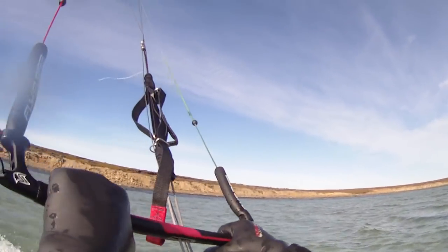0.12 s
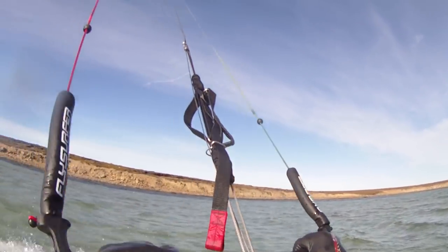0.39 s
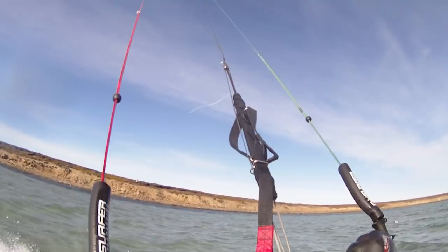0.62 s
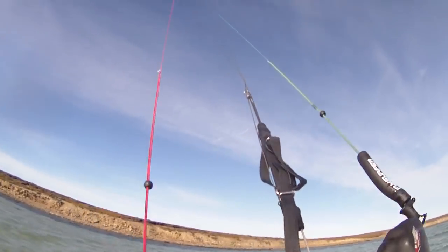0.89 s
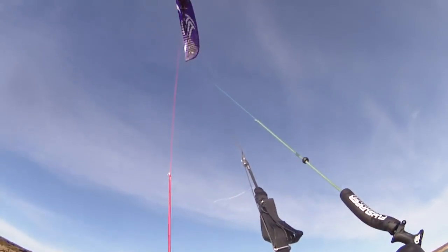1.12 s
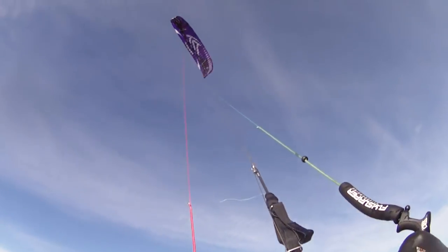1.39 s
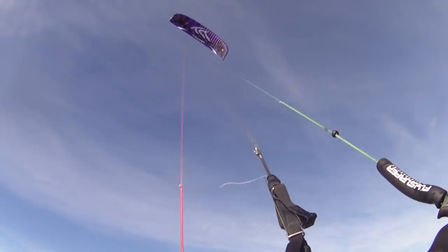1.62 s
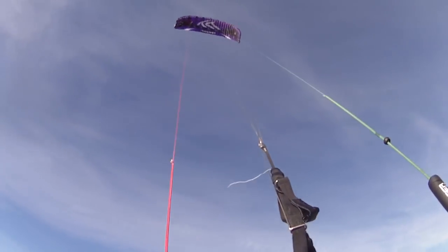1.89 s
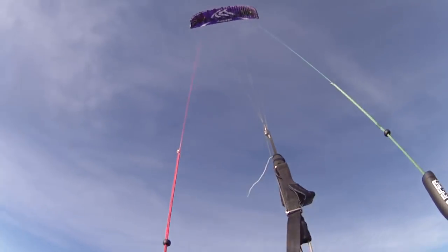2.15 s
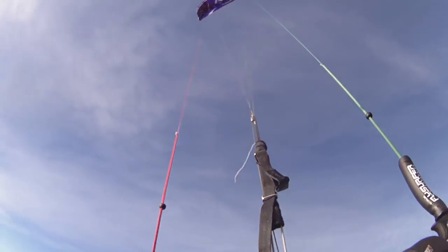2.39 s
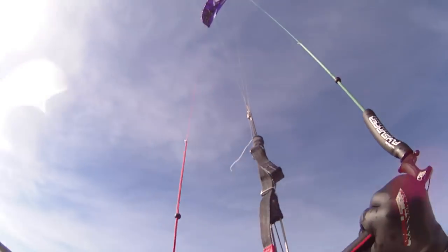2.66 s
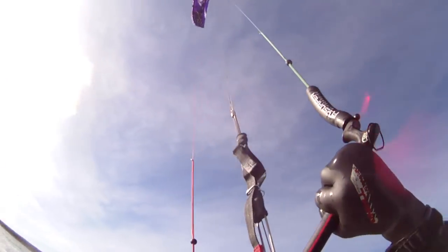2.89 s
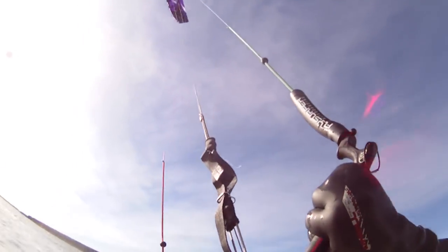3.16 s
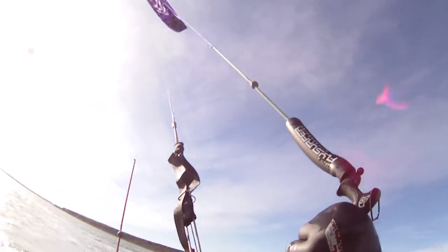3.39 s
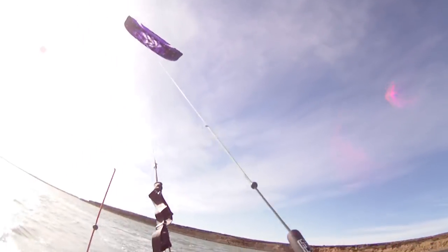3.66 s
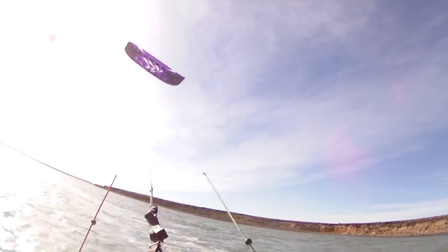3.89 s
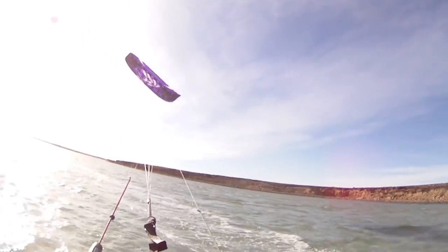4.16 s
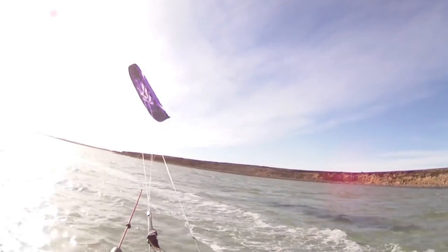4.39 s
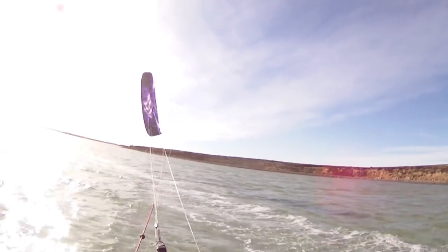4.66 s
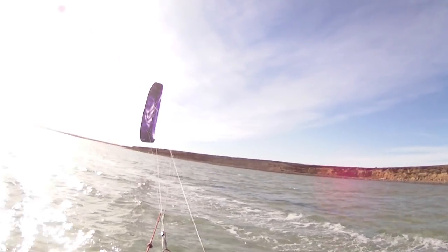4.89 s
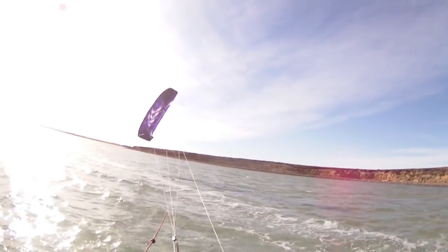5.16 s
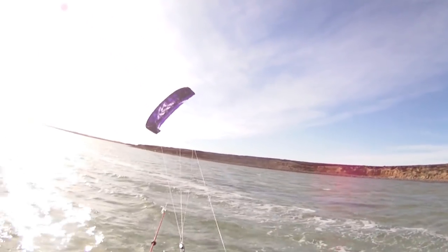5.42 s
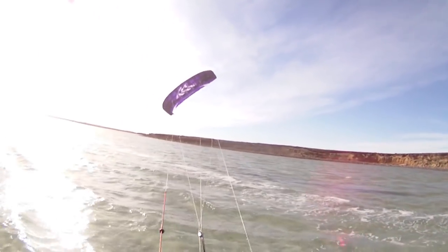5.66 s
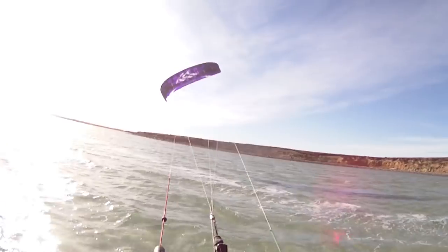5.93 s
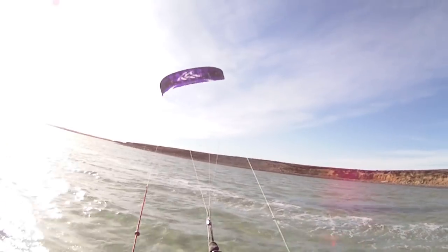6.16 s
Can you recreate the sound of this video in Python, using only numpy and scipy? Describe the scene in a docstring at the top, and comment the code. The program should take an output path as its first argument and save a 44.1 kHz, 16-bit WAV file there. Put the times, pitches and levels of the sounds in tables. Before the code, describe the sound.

A kite rider skims choppy water, heard from inside a sealed plastic case on the helmet. Light wind flutters boxily with soft slaps and thin spray hiss. A knock comes at one second, more cluster after two, then the wind surges and stays hard while loud hollow knocks and dry ticks rattle the mount. The knocks stop and strong gusts continue to the end.

```python
"""A rider planes over choppy water in strong wind, heard from inside a sealed plastic case on the helmet.
First light gusts buffet the case as lumpy noise shaped by its hollow, its edge whistles, soft slaps drive its
lowest modes and patchy noise hisses as spray, over a faint rumble and whine. From 1 s the mount ticks and knocks
ring the case modes; the head tilts back, the spray narrows and weakens. About 3 s the head turns: the spray changes
colour, the wind surges and stays hard, knocks come harder until 4.8 s, ticks until 5 s and slaps until 5.8 s."""
import sys
import numpy as np
from scipy import signal
from scipy.fft import rfft, irfft, next_fast_len
from scipy.io import wavfile

SR = 44100
rng = np.random.default_rng(int(sys.argv[2]) if len(sys.argv) > 2 else 0)


def attenuation_scalar(level_db):
    """Turn a level in dB into a linear amplitude multiplier (20 dB per decade)."""
    decades = np.asarray(level_db, float) / 20
    return 10 ** decades


def waveform_to_disk(signal):
    """Save audio, clipped to [-1, 1], as 16-bit WAV at the path in sys.argv[1]."""
    frames = np.transpose(np.atleast_2d(signal))
    scaled = np.clip(frames, -1, 1) * 32767
    samples = np.round(scaled).astype(np.int16)
    wavfile.write(sys.argv[1], SR, samples)


N = 277389


def rms_one(x):
    """Scale to rms 1."""
    return x / np.sqrt(np.mean(x ** 2) + 1e-20)


def in_time(rows):
    """Interpolate each column of a curve to one value per sample."""
    t_s, *columns = np.transpose(rows)
    return [np.interp(np.arange(N) / SR, t_s, column) for column in columns]


def butter(order, hz, kind, x):
    """Causal Butterworth filter."""
    return signal.sosfilt(signal.butter(order, hz, kind, fs=SR, output="sos"), x)


def drift(rate_hz):
    """Slow random curve of rms 1: noise twice through a one-pole low-pass."""
    r = np.exp(-2 * np.pi * rate_hz / SR)
    noise = rng.standard_normal(N + SR)
    return rms_one(signal.lfilter([1], [1, -2 * r, r * r], noise)[SR:])   # first second settles the filter


def coloured(x, spectrum):
    """Give x the spectrum with a causal (minimum-phase) filter; rms 1."""
    size = 2 * next_fast_len(N // 2 + 1)
    hz = np.fft.rfftfreq(size, 1 / SR) + 0.00086   # keeps log(0) away
    point_hz, point_db = np.transpose(spectrum)
    gain = attenuation_scalar(np.interp(np.log(hz), np.log(point_hz), point_db, -100, -100))
    cepstrum = irfft(np.log(gain), size)
    cepstrum[1:size // 2] *= 2   # fold to causal
    cepstrum[size // 2 + 1:] = 0
    response = np.exp(rfft(cepstrum))
    return rms_one(irfft(rfft(x, size) * response, size)[:N])


def ring(clicks, hz, t60_s):
    """Two-pole resonance: a unit click starts a decaying sine of initial height 1."""
    r, w = attenuation_scalar(-60 / (t60_s * SR)), 2 * np.pi * hz / SR
    return signal.lfilter([0, np.sin(w)], [1, -2 * r * np.cos(w), r * r], clicks + 1e-18)


def eddies(slow_db, fast_db):
    """Noise in lumps: eddies of several sizes roll over the case."""
    return rng.standard_normal(N) * attenuation_scalar(slow_db * drift(11.4) + fast_db * drift(71.0))


# gusts on the case: [t/s, level/dB]
GUSTS = [(0.0, -37), (0.18, -36.5), (0.32, -40.5), (0.39, -36), (0.45, -40), (0.55, -35), (0.62, -38.5),
         (0.78, -33), (0.92, -32.5), (1.25, -33.5), (1.36, -36), (1.52, -39.5), (2.2, -40.5), (2.35, -35),
         (2.47, -40), (2.56, -42), (2.62, -39.5), (2.72, -39), (2.9, -36.5), (3.1, -41), (3.145, -41),
         (3.16, -35.5), (3.5, -24.5), (3.85, -21.5), (3.97, -21.5), (4.07, -29), (4.4, -28.5), (4.55, -28),
         (4.7, -26.5), (4.93, -26.5), (5.04, -28.5), (5.13, -23), (5.24, -22.5), (5.34, -24), (5.78, -23),
         (5.9, -27.5), (6.16, -27), (6.28, -23.5)]


def gusts():
    """Wind strength on the case, the common drive of buffet, whistle and rumble."""
    return in_time(GUSTS)[0]


# buffet colour, light and hard gusts: [f/Hz, relative density/dB]
BUFFET_LIGHT = [(53, -85), (90, -68), (162, -37.5), (242, -23.5), (336, -0.5), (483, -11), (636, 1.5),
                (986, 1), (1220, -15), (1330, -3), (1800, -24.5), (2340, -67)]
BUFFET_HARD = [(53, -82), (90, -39.5), (203, -16), (340, -1.5), (376, 0.5), (437, -2), (540, -3),
               (730, 3.5), (950, -3), (1370, -1.5), (1800, -54.5), (2340, -78)]
# air over the case edge, (light, hard) gusts: [f/Hz, relative density/dB]
EDGE_WHISTLE = [(1030, 15), (1750, -18.5), (1900, -16), (2020, 0.5), (2310, -5), (2600, -22), (3380, -23.5),
                (5720, -120)], [(940, 4), (1600, 6), (2160, -5), (2340, -0.5), (2460, -8.5), (2800, -30),
                (3640, -39), (6160, -120)]
# wind angle on the case: [t/s, gust hardness 0-1, whistle re gust/dB, body share/dB, lid share/dB]
ANGLE = [(0, 0.36, -7.5, 6.5, 0), (.5, 0.13, -6.5, 4, -0.097), (1.0, 0.12, -10.5, -1, 0.02),
         (1.5, 0.29, -10, -0.5, 0.93), (2.1, 0.49, -9.5, -1, 0.11), (2.7, 0.85, -18, 1, 0.51),
         (3.1, 0.71, -8, -5, 1), (3.22, 0.69, -18.5, 2.5, -1.5), (3.5, 0.34, -20, 1.5, -2.4),
         (3.9, 0.68, -14.5, -3, 0.43), (4.5, 0.8, -14, 2.5, 0.57), (4.85, 0.59, -15.5, 2.5, -1.1),
         (5.3, 0.71, -10, 1, 1), (5.7, 0.75, -7.5, 3.5, 1), (6.29, 0.64, -12.5, 0.5, 1)]
BODY_BELOW_HZ, LID_ABOVE_HZ = 520, 950


def buffet(gust_db):
    """The same lumps shake the case and whistle over its edge; the angle decides how much body and lid take."""
    hardness, edge_db, body_db, lid_db = in_time(ANGLE)
    level_db = gust_db + 0.17 * drift(2.4)
    whistle_db = gust_db + edge_db + 1.2 * drift(4.0)
    # small vortices bursting, 60 per second
    pops = (rng.random(N) < 60 / SR) * rng.choice([-1, 1], N) * attenuation_scalar(21 + 2.1 * rng.standard_normal(N))
    lumps = eddies(1.36, 2.13) + 0.31 * rng.standard_normal(N) + pops
    light, hard = np.sqrt(1 - hardness), np.sqrt(hardness)
    hard_lumps = lumps[::-1]   # reversed: unrelated to the light part
    shake = light * coloured(lumps, BUFFET_LIGHT) + hard * coloured(hard_lumps, BUFFET_HARD)
    whistle = light * coloured(lumps, EDGE_WHISTLE[0]) + hard * coloured(hard_lumps, EDGE_WHISTLE[1])
    body = signal.sosfiltfilt(signal.butter(2, BODY_BELOW_HZ, fs=SR, output="sos"), shake)
    lid = signal.sosfiltfilt(signal.butter(2, LID_ABOVE_HZ, "high", fs=SR, output="sos"), shake)
    hollow = shake - body - lid
    shaken_case = attenuation_scalar(body_db) * body + hollow + attenuation_scalar(lid_db) * lid
    return attenuation_scalar(level_db) * shaken_case + attenuation_scalar(whistle_db) * whistle


# narrow edge tone: [t/s, level/dB]
EDGE_TONE = [(1.5, -82), (2.1, -65), (2.6, -59.5), (3.1, -60), (3.45, -49.5), (4.0, -51), (4.8, -49),
             (5.5, -62), (6.29, -50)]
TONE_HZ, TONE_T60_S = 2304, 0.005


def edge_tone():
    """Lumpy air twice through one resonance."""
    once = ring(eddies(1.1, 1.4), TONE_HZ, TONE_T60_S)
    tone = rms_one(ring(once, TONE_HZ, TONE_T60_S))
    return attenuation_scalar(in_time(EDGE_TONE)[0]) * tone


# case modes, grouped as body, hollow, lid, shell, wall: [f/Hz, level/dB, t60/s]
CASE_MODES = [
    [(362.4, -12, 0.049)],
    [(752, -5, 0.0084)],
    [(1238, 4, 0.0059)],
    [(1940, -6.5, 0.011), (2270, 0.5, 0.0054), (3280, -2.5, 0.0021)],
    [(5100, 5, 0.0037), (7000, 2.5, 0.0023)],
]
# knocks on the mount: [t/s, level/dB, struck spot/octaves above hollow mode, fall-off/dB per octave]
KNOCKS = [(1.0532, -13.5, .01, 26), (1.0543, -16, 2.8, 29), (2.0057, -29, 2.8, 6),
          (2.2249, -26.5, 1.1, 2.5), (2.228, -19.5, 1.03, 11), (2.286, -15.5, 0.52, 4),
          (2.4915, -16.5, 0.34, 18), (2.6754, -22.5, 0.35, 4), (2.7673, -13.5, 0.27, 4),
          (2.8438, -30, 3.3, 3), (2.864, -17, .05, 12.5), (2.9104, -23, 2.26, 11), (2.9298, -20, 1.1, 5.5),
          (3.048, -27.5, 1.9, 9), (3.3492, -18, 3.6, 4), (3.3597, -23, 3.4, 6), (3.3909, -8.5, 1.26, 13),
          (3.5345, -2, 0.32, 15.5), (3.6592, -8, .01, 9.5), (3.6598, -17, 2.85, 16),
          (3.7134, -5.5, .01, 12.5), (3.7502, -6, .01, 13.5), (3.871, -27, 1.2, 3), (3.987, -4, 0.0092, 17),
          (3.988, -25, 3.3, 5), (4.0042, -20, 3.6, 1), (4.05, -23.5, 4.6, 0.5), (4.1392, -20, 0.99, 14),
          (4.216, -31, 2.7, 5), (4.294, 0, 0.18, 12.5), (4.3441, -17.5, 1.3, 0.5), (4.436, -16.5, 2.6, 2),
          (4.755, -3.5, 1.22, 26), (4.7559, -20, 2.8, 22)]
BELOW_STEEPER = 1.1   # fall-off factor for modes below the struck spot
REBOUND_SHARE, REBOUND_SOFT_HZ = 0.81, 1700   # rebound is weaker, and duller above this


def knocks():
    """A contact and a quick rebound ring the case modes, most strongly near the struck spot."""
    t_s, level_db, spot, falloff_db = np.transpose(KNOCKS)
    modes = sum(CASE_MODES, [])
    hollow_hz = CASE_MODES[1][0][0]
    count, out = len(t_s), np.zeros(N)
    at = (t_s * SR).astype(int)
    delay_s = 0.001256 + 0.00012 * np.clip(rng.standard_normal(count), -2, 2)
    rebound = at + (SR * delay_s).astype(int)
    for k, (hz, mode_db, t60_s) in enumerate(modes):
        away = np.log2(hz / hollow_hz) - spot
        near_db = level_db - falloff_db * np.where(away < 0, -BELOW_STEEPER * away, away)
        clicks = np.zeros(N)
        sign = -(-1) ** k   # neighbouring modes start in opposite directions
        clicks[at] = sign * attenuation_scalar(near_db + mode_db + 1.2 * rng.standard_normal(count))
        rebound_gain = REBOUND_SHARE * (1 + 0.15 * rng.standard_normal(count)) / (1 + (hz / REBOUND_SOFT_HZ) ** 2)
        clicks[rebound] += clicks[at] * rebound_gain
        # band-limited contact: little spills far from the mode
        contact = butter(2, [hz / 1.3, hz * 1.296], "band", clicks + 1e-18)
        out += ring(contact * SR / hz / 27.6, hz, t60_s)
    return butter(4, 260, "high", out)   # the sealed case passes no bass


# soft slaps of water or air: [t/s, hollow level/dB, body level/dB, lid level/dB, length/s]
SLAPS = [(0.025, -23, -29, -33, 0.0028), (0.032, -19.5, -36, -29, 0.0068), (0.061, -22, -30, -40, 0.055),
         (0.103, -27, -28, -36, 0.059), (0.233, -25.5, -33, -33, 0.033), (0.885, -28, -46, -35, 0.031),
         (0.902, -26, -54, -32, 0.014), (1.155, -31, -47, -26.5, 0.007), (1.32, -30.5, -36, -38, 0.044),
         (2.346, -22.5, -32, -28, 0.008), (2.371, -23, -32.5, -33, 0.02), (2.468, -28, -28.5, -40, 0.01),
         (2.4935, -20, -27, -25, 0.0048), (2.499, -20, -28, -26, 0.0032), (2.507, -21.5, -35, -33, 0.0094),
         (2.517, -14.5, -28, -28, 0.0062), (3.591, -13.5, -38, -28, 0.025),
         (3.845, -18, -23, -12.5, 0.0072), (4.634, -13, -44, -29, 0.007), (4.827, -25, -33, -17.5, 0.0058),
         (5.232, -20, -27, -13.5, 0.014), (5.757, -18, -30, -34, 0.027)]
PRESSED = 0.91   # a slap presses the case: mode pitch factor
SLAP_SAMPLES = 2048   # longer slaps are cut here, 46 ms


def slaps():
    """A swell of noise some milliseconds long drives the three lowest modes."""
    out = np.zeros(N)
    t_s = np.arange(SLAP_SAMPLES) / SR
    for start_s, hollow_db, body_db, lid_db, length_s in SLAPS:
        swell = np.sin(np.pi * np.sqrt(np.clip(t_s / length_s, 0, 1)))   # quick rise
        at = int(start_s * SR)
        for level_db, [(hz, _, t60_s)] in zip((body_db, hollow_db, lid_db), CASE_MODES):
            push = swell * rng.standard_normal(SLAP_SAMPLES)
            # second resonance softens the push: little spills far from the mode
            rung = ring(ring(push, PRESSED * hz, t60_s), PRESSED * hz, 0.0098)
            out[at:at + SLAP_SAMPLES] += attenuation_scalar(level_db) * rung / np.abs(rung).max()
    return butter(3, [210, 1900], "band", out)


# dry ticks of the mount, alone or with a knock: [t/s, level/dB, f/Hz]
TICKS = [(0.9921, -31, 10800), (1.954, -31, 12000), (2.0053, -27, 15300), (2.2202, -36, 11500),
         (2.2255, -27, 12200), (2.2858, -34, 11100), (2.4908, -36, 15700), (2.6755, -33.5, 11300),
         (2.7674, -30, 14500), (2.7834, -43, 14000), (2.829, -32, 14500), (2.8362, -34, 13000),
         (2.8441, -40, 15200), (2.8645, -35, 15000), (2.9105, -26, 11700), (2.9298, -28, 13500),
         (3.1268, -40, 16000), (3.35, -21, 13100), (3.3594, -27, 12500), (3.3909, -26, 11800),
         (3.4176, -33, 12100), (3.5146, -32, 13000), (3.5306, -31, 12400), (3.659, -25.5, 13000),
         (3.7429, -27, 13800), (3.978, -27, 12300), (3.9878, -35, 13500), (4.0034, -26, 12500),
         (4.1385, -33, 15800), (4.2158, -35, 14000), (4.2943, -27, 14300), (4.3441, -24, 14600),
         (4.4361, -36, 14500), (4.751, -30, 12200), (4.7557, -32, 12000), (5.03, -27, 12500)]
TICK_T60_S, TICK_ROUGH, TICK_SAMPLES = 0.0013, 0.46, 128


def ticks():
    """A rough snap about a millisecond long, each ringing at a high pitch of its own."""
    out = np.zeros(N)
    fade = attenuation_scalar(-60 * np.arange(TICK_SAMPLES) / SR / (2 * TICK_T60_S))
    click = np.arange(TICK_SAMPLES) == 0
    for t_s, level_db, hz in TICKS:
        roughness = TICK_ROUGH * rng.standard_normal(TICK_SAMPLES) * fade
        snap = ring(roughness + click, hz, TICK_T60_S)
        at = int(t_s * SR)
        out[at:at + TICK_SAMPLES] += attenuation_scalar(level_db) * snap / np.abs(snap).max()
    return butter(3, 8500, "high", out)


# spray: [t/s, level/dB]
SPRAY = [(0.0, -51.5), (0.4, -54), (0.7, -50), (1.03, -48), (1.3, -49), (1.58, -54.5), (1.91, -58),
         (2.31, -58), (2.57, -60.5), (3.19, -57), (3.84, -53), (4.01, -58), (4.52, -51.5), (5.04, -49),
         (6.18, -49), (6.29, -54.5)]
# mist, fine part of the spray: [t/s, level re spray/dB]
MIST = [(0, -11.5), (.9, -10.5), (1.25, -6), (2.15, -4), (3.2, -10), (3.8, -6), (6.29, -7)]
# spray colour through the case wall, (coarse, fine) part: [f/Hz, relative density/dB]
SPRAY_BEHIND = [(1470, -46), (2500, -33), (2730, -9.5), (2990, -32), (3490, -27), (3960, -6), (4800, 1.5),
                (5470, -7), (5940, -7.5), (7600, -14.5), (8700, -30), (11300, -57)], [(5120, -43),
                (8700, -41), (9790, -4.5), (10400, -2.5), (12600, -6), (15900, -6.5), (17000, -3)]
SPRAY_FRONT = [(1530, -39), (2600, -2), (2780, -25), (3090, -3.5), (3590, -5.5), (3840, -12.5), (4290, 4),
               (5520, 5.5), (6360, -1), (7000, -1), (8700, -16.5), (11300, -50)], [(5120, -45), (8700, -16),
               (10400, -12), (11200, -6.5), (12000, -1), (13000, -7.5), (14100, -3.5), (15400, -13),
               (17000, -7)]
# coarse spray with the head tilted back, narrowed to one band: [f/Hz, relative density/dB]
SPRAY_ABOVE = [(2500, -42), (2750, -18), (3300, -15), (3800, -23), (4400, -16), (5000, 5), (5600, -7.5),
               (7300, -11), (8700, -21.5), (11300, -55)]
TURN_START_S, TURN_END_S = 2.6, 3.3
TILT_START_S, TILT_FULL_S, TILT_END_S = 0.87, 2.8, 3.6


def spray():
    """Lightly patchy hiss with small droplets; its colour follows the head's tilt and turn."""
    (level_db,), (mist_db,) = in_time(SPRAY), in_time(MIST)
    t_s = np.arange(N) / SR
    front = np.clip((t_s - TURN_START_S) / (TURN_END_S - TURN_START_S), 0, 1)
    tilt = np.interp(t_s, [TILT_START_S, TILT_FULL_S, TILT_END_S], [0, 0.85, 0])
    drops = (rng.random(N) < 150 / SR) * attenuation_scalar(13 + 3.5 * np.minimum(rng.exponential(1, N), 3))   # 150 per second
    out = attenuation_scalar(level_db) * np.sqrt(tilt) * coloured(eddies(2.5, 1.2), SPRAY_ABOVE)
    coarse_gain, fine_gain = attenuation_scalar(level_db) * np.sqrt(1 - tilt), attenuation_scalar(level_db + mist_db)
    for share, (coarse, fine) in ((1 - front, SPRAY_BEHIND), (front, SPRAY_FRONT)):
        hiss = eddies(0.78, 0.89) + drops * rng.choice([-1, 1], N)
        out = out + np.sqrt(share) * (coarse_gain * coloured(hiss, coarse) + fine_gain * coloured(hiss, fine))
    return out


RUMBLE_DB, RUMBLE_FOLLOWS = -65.5, 0.28   # level at a gust of -17.5 dB, share of the gust's dB swing
WHINE_HZ, WHINE_DB = 15734.4, -79


def electronics(gust_db):
    """A faint low rumble, band-passed noise that rises a little with the wind, and a steady thin sine whine."""
    rumble = rms_one(butter(1, [14, 45], "band", rng.standard_normal(N)))
    whine = np.sqrt(2) * np.sin(2 * np.pi * WHINE_HZ * np.arange(N) / SR)
    rumble_db = RUMBLE_DB + RUMBLE_FOLLOWS * (gust_db + 17.5)
    return attenuation_scalar(rumble_db) * rumble + attenuation_scalar(WHINE_DB) * whine


def scene():
    """Wind, mount, spray and electronics add up at one microphone."""
    gust_db = gusts()
    wind = buffet(gust_db) + edge_tone()
    case = knocks() + slaps() + ticks()
    return (wind + case + spray() + electronics(gust_db))[None, :]


def top_cut(x):
    """Nothing passes above the cut-off."""
    return signal.sosfilt(signal.butter(12, 18400, fs=SR, output="sos"), x)


def record(dry):
    """A steep low-pass removes the top."""
    cut = signal.cheby2(10, 20, 17400, fs=SR, output="sos")   # 20 dB down from 17.4 kHz
    mix = signal.sosfilt(cut, dry)
    return top_cut(mix)


dry = scene()
out = record(dry)
waveform_to_disk(out)
```